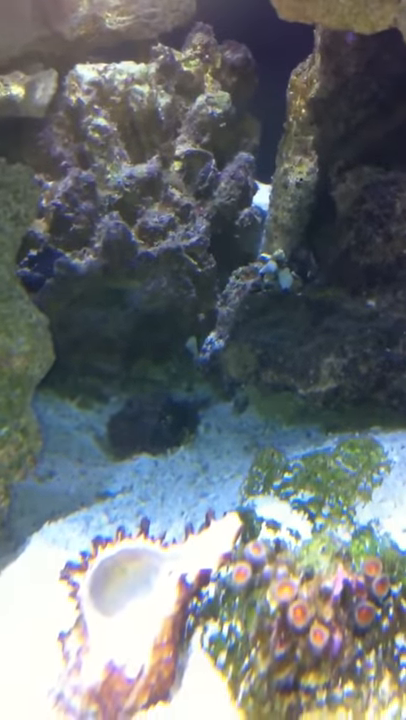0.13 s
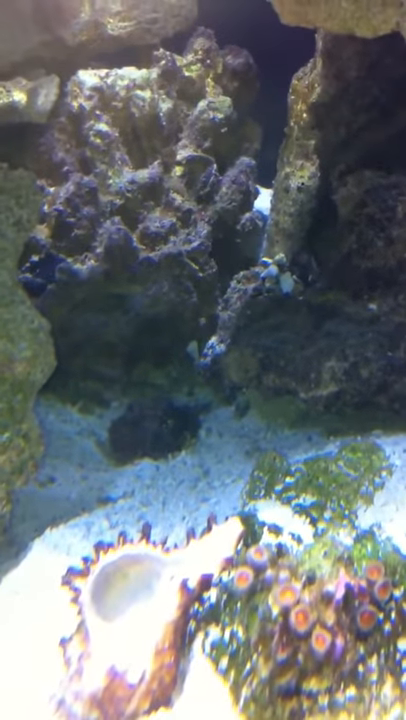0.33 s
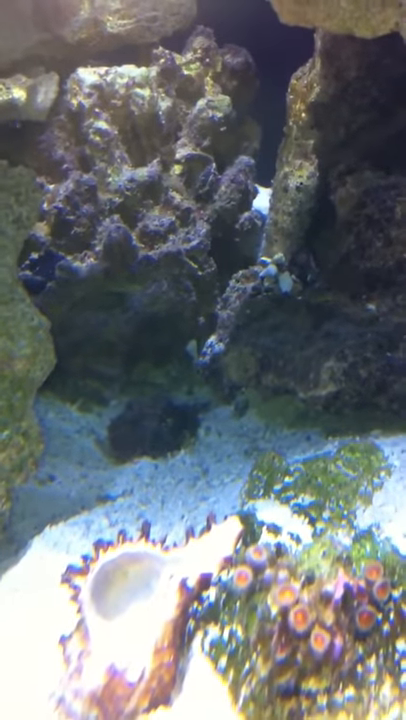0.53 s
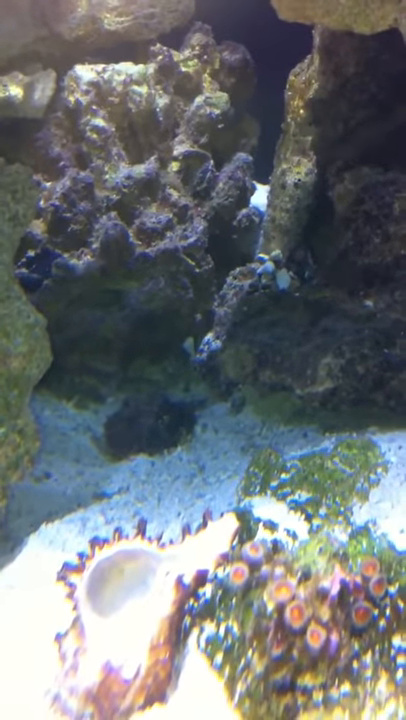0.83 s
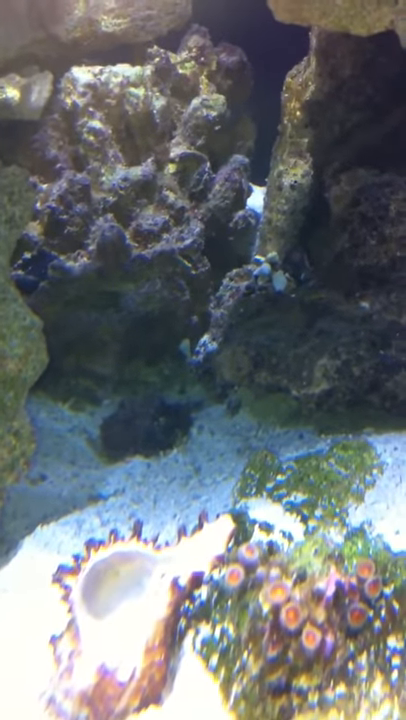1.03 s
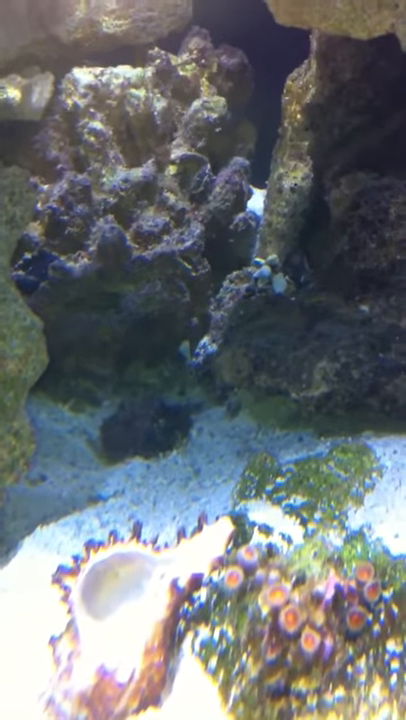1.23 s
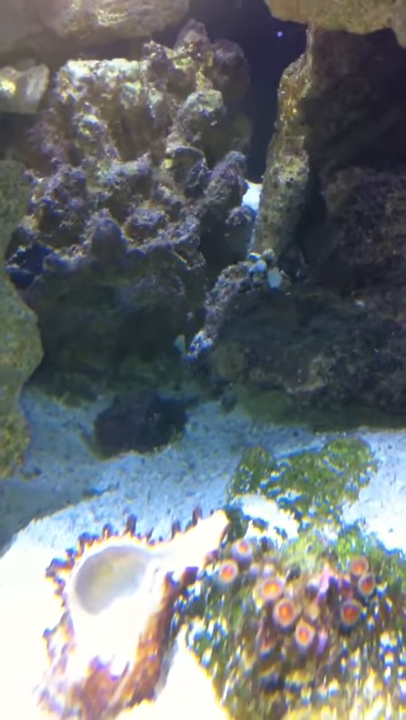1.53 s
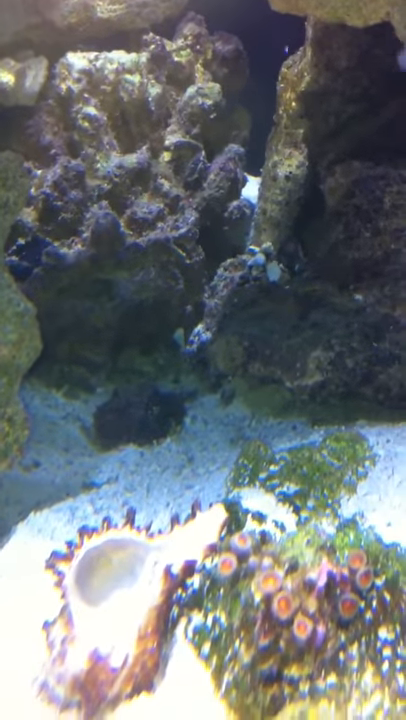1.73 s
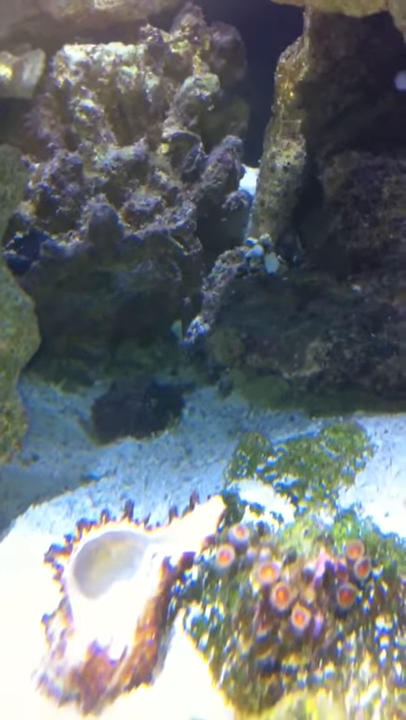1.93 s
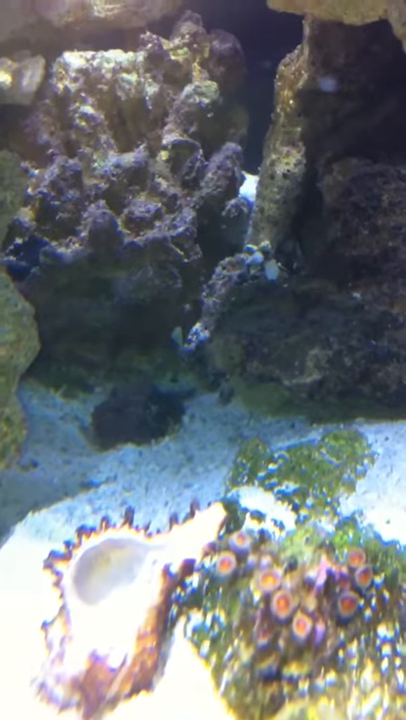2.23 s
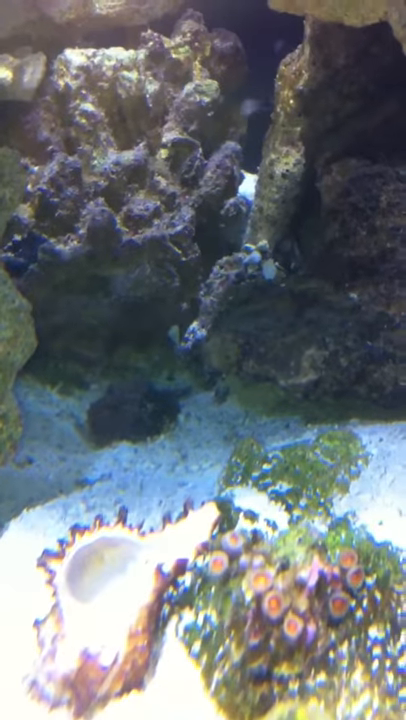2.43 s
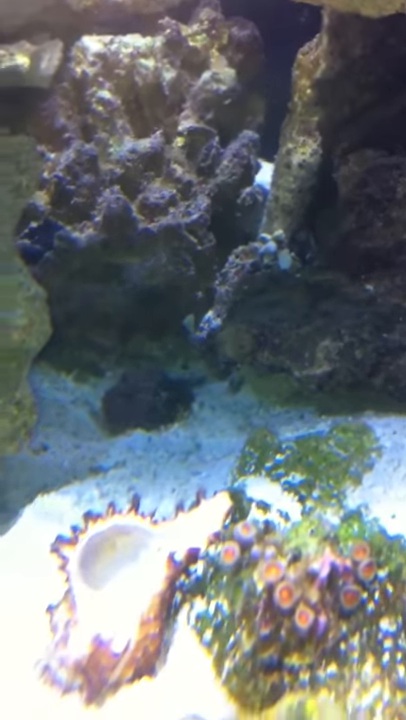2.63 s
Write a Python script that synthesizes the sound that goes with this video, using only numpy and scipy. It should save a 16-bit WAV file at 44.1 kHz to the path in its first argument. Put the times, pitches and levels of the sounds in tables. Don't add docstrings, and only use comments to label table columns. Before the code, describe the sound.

One small shell-like snap near the end, close up, above humming tank pumps and soft water hiss

```python
import sys
import numpy as np
from scipy import signal
from scipy.io import wavfile
from scipy.ndimage import uniform_filter1d

SR = 44100
rng = np.random.default_rng(int(sys.argv[2]) if len(sys.argv) > 2 else 0)


def master_out(mix):
    frames = np.transpose(np.atleast_2d(mix))
    ceiling = np.clip(frames, -1, 1)
    pcm = np.round(ceiling * 32767).astype(np.int16)
    wavfile.write(sys.argv[1], SR, pcm)


def magnitude_from_level(level_db):
    exponent = np.asarray(level_db, float) / 20
    return 10 ** exponent


N = 122598


def evened(x):
    return x / np.sqrt(np.mean(x ** 2) + 1e-20)


def curve(points):
    return np.interp(np.arange(N) / SR, *np.transpose(points))


def drift(rate_hz):
    t = np.arange(0, N + 64, 64) / SR
    slow = 0
    for f in np.geomspace(.05, 1, 16):
        slow = slow + np.sin(2 * np.pi * (f * rate_hz * t + rng.random())) / np.sqrt(f)
    return np.repeat(evened(slow), 64)[:N]


def resonate(x, peaks):
    out = 0
    for k, (hz, width, db) in enumerate(peaks):
        turn = np.exp(2j * np.pi * hz * np.arange(len(x)) / SR)
        r = np.exp(-np.pi * width / SR)
        low = signal.lfilter([(1 - r) ** 2], [1, -2 * r, r * r], x / turn)
        out = out + (-1) ** k * magnitude_from_level(db) * 2 * (turn * low).real
    return out


def tone(hz, db):
    cycles = np.cumsum(hz * np.ones(N)) / SR + rng.random()
    return np.sqrt(2) * magnitude_from_level(db) * np.sin(2 * np.pi * cycles)


def wash(points, db, patchy_db, swell_db):
    frames, hz = N // 512 + 5, np.fft.rfftfreq(2048, 1 / SR)
    a, b, patches = rng.standard_normal((frames, 1025, 3)).T
    patches = uniform_filter1d(patches, size=12, axis=0)
    patches = evened(uniform_filter1d(patches, size=6, axis=1))
    f, value = np.transpose(points)
    shape = np.interp(np.log(hz + 1), np.log(f + 1), value, -80, -80)
    z = (a + 1j * b) * magnitude_from_level(shape[:, None] + patchy_db * patches)
    noise = signal.istft(z, nperseg=2048, noverlap=1536)[1][:N]
    return magnitude_from_level(db + swell_db * drift(3)) * evened(noise)


# t/s, peak level/dB, dull share/dB
TICKS = [(.597, -59, -6), (2.2518, -61, -12), (2.2815, -51, -10), (2.3115, -53, -10), (2.3138, -51, 11),
         (2.3156, -58, 13), (2.3225, -62, 4), (2.3293, -59, 7), (2.3375, -60, 2), (2.3404, -58, 0),
         (2.3435, -61, 3), (2.3475, -57, -6), (2.3497, -58, -8), (2.3560, -41, -8), (2.3603, -46, -12),
         (2.3617, -48, -8), (2.3633, -43, -12), (2.3773, -43, -10), (2.3782, -41, -10), (2.3793, -45, -14),
         (2.3837, -43, -12), (2.3863, -42, -16), (2.3893, -43, -15), (2.3913, -41, -15), (2.3938, -41, -13),
         (2.3961, -42, -12), (2.3975, -45, -12), (2.3993, -44, -11), (2.4006, -45, -14), (2.4027, -49, -14),
         (2.4040, -47, -6), (2.4074, -42, -14), (2.4092, -49, -8), (2.4113, -47, -14), (2.4138, -50, -9),
         (2.4154, -52, -12), (2.4185, -53, -10), (2.4224, -54, -12), (2.4871, -60, -12)]
# f/Hz, width/Hz, level/dB
BRIGHT = [(9000, 1100, -13), (10500, 1400, -7), (11900, 1700, 0), (13300, 1800, -5), (14800, 1500, -6)]
# f/Hz, width/Hz, level/dB
DULL = [(3050, 2500, -5), (4240, 1430, 2), (6300, 1300, -4)]


def ticks():
    decay_s, rise_s, gain_db = .0004, .0003, 1.5
    out, t = np.zeros(N), np.arange(300) / SR
    envelope = np.exp(-t / decay_s) * np.minimum(t / rise_s, 1)
    for s, db, dull_db in TICKS:
        puff = rng.standard_normal(300) * envelope
        bright, dull = resonate(puff, BRIGHT), resonate(puff, DULL)
        mix = bright / abs(bright).max() + magnitude_from_level(dull_db) * dull / abs(dull).max()
        out[round(s * SR):][:300] += magnitude_from_level(db + gain_db) * mix
    return out


# t/s, level/dB
CRACKLE = [(2.3, -88), (2.345, -72), (2.372, -72), (2.384, -64), (2.4, -62), (2.418, -63), (2.44, -74),
           (2.5, -88)]
# f/Hz, width/Hz, level/dB
CRACKLE_BODY = [(2400, 900, 0), (3900, 900, 0), (5200, 900, -4), (6500, 800, -5)]


def crackle():
    per_s = 3000
    size = magnitude_from_level(2.0 * np.minimum(rng.exponential(1, N), 4))
    hits = size * (rng.random(N) < per_s / SR) * rng.choice([-1, 1], N)
    bright = evened(resonate(hits, BRIGHT))
    body = evened(resonate(hits, CRACKLE_BODY))
    return magnitude_from_level(curve(CRACKLE)) * (bright + magnitude_from_level(1.5) * body)


# t/s, peak level/dB, brightness/(dB per octave)
SNAPS = [
    (2.4021, -27.5, 1),
    (2.4052, -41, 3),
    (2.4344, -39, -3),
    (2.4640, -45, -3),
]
# f/Hz, level/dB, t60/s
SHELL = [(1071, -8, .07), (1513, -6, .05), (1800, -12, .015), (2067, -4, .04), (2130, -8, .04),
         (2405, -4, .05), (2750, -9, .015), (3050, -13, .015), (3380, -5, .05), (3704, -8, .04),
         (4100, -16, .015)]


def snaps():
    out, t = np.zeros(N), np.arange(4000) / SR
    for s, db, tilt_db in SNAPS:
        ring = 0
        for hz, mode_db, t60 in SHELL:
            level = mode_db + tilt_db * np.log2(hz / 2400) - 60 * t / t60
            ring = ring + magnitude_from_level(level) * np.cos(2 * np.pi * hz * (t - .0004))
        rattle = evened(resonate(rng.standard_normal(4000), [(2300, 1200, 0), (3500, 1200, -2)]))
        here = out[round(s * SR):][:4000]
        here += magnitude_from_level(db) * ring / abs(ring).max() * np.minimum(t / .0005, 1)
        here += magnitude_from_level(db - 24 - 60 * t / 0.09) * rattle
    return out + magnitude_from_level(-12) * np.roll(out, round(.006 * SR))


# t/s, peak level/dB, f/Hz, t60/s
BUBBLES = [(.192, -56, 4400, .025), (.194, -67, 9500, .02), (.262, -71, 15500, .3), (.274, -65, 15550, .06),
           (.313, -54, 3850, .02), (.325, -53, 3600, .02), (2.251, -58, 11300, .015),
           (.382, -54, 2080, .04), (.82, -56, 1500, .05), (2.188, -47, 3800, .022),
           (2.4348, -46, 2200, .018), (2.3165, -52, 3900, .018), (2.366, -45, 1090, .04),
           (2.3706, -43, 1050, .045), (2.369, -52, 2250, .025), (2.374, -55, 3950, .03),
           (2.58, -62, 4500, .05), (2.706, -60, 4300, .025), (2.737, -59, 4500, .025)]


def bubbles():
    out, t = np.zeros(N), np.arange(1600) / SR
    for s, db, hz, t60 in BUBBLES:
        sine = np.sin(2 * np.pi * hz * t * (1 + .2 * t))
        out[round(s * SR):][:1600] += magnitude_from_level(db - 60 * t / t60) * np.minimum(t / .002, 1) * sine
    return out


# multiple of the mains, level/dB
HUM = [(1, -86.5), (2, -72), (3, -61), (4, -55), (6, -62.5), (7, -68), (8, -59), (9, -66), (12, -60),
       (14, -62.5), (17, -71), (20, -72.5), (25, -78)]
TONES_HZ = [92.3, 115, 610.6, 1074, 1221.4, 1526.8, 1807.5, 2137.4, 2341, 2581, 14078.8, 15000]
TONES_DB = [-87, -75, -65, -61, -75, -75, -78, -78, -80, -76, -85, -91]
# f/Hz, width/Hz, level/dB
CABINET = [(256.2, 24, -63), (406.7, 51, -61.5)]
# t/s, level/dB
WHINE = [(0, -80), (.48, -78), (.58, -69), (.78, -65), (.9, -68), (1.45, -68), (1.7, -72), (2.1, -80),
         (2.78, -80)]


def pumps():
    mains_hz, waver_db = 60.03, .1
    hum = sum(tone(k * mains_hz, db + waver_db * drift(2.0)) for k, db in HUM)
    free = sum(tone(hz, db + waver_db * drift(1.4)) for hz, db in zip(TONES_HZ, TONES_DB))
    box = 0
    for hz, width, db in CABINET:
        box = box + magnitude_from_level(db) * evened(resonate(rng.standard_normal(N), [(hz, width, 0)]))
    whine_hz = 2078 - 14. * np.arange(N) / SR + 1.2 * drift(12)
    whine = tone(whine_hz, curve(WHINE) + .6 * drift(25))
    return hum + free + box + whine


# f/Hz, level/(dB per Hz)
PUMP = [(25, -35), (75, -36), (140, -10), (230, -1), (400, -2.5), (660, -9), (1060, -7), (1500, -26.5),
        (2500, -76)]


def pump_body():
    return wash(PUMP, -51.5, patchy_db=-0.95, swell_db=0.82)


# f/Hz, level/(dB per Hz)
HISS = [(710, -37), (1200, -3.5), (1410, -5), (1540, -3.5), (2510, -5), (6670, -21.5), (10700, -26),
        (14600, -23.5), (15600, -27)]


def water():
    return wash(HISS, -59.5, patchy_db=0.9, swell_db=0.72)


def scene():
    peel = ticks() + crackle() + snaps()
    tank = bubbles() + pumps() + pump_body() + water()
    return (peel + tank)[None]


# start t/s, end t/s, low f/Hz, high f/Hz
DROPOUTS = [(2.270, 2.279, 9500, 12500), (2.284, 2.293, 10500, 12500), (2.293, 2.311, 7500, 11500),
            (2.294, 2.303, 6000, 13000), (2.339, 2.349, 12500, 15700), (2.366, 2.375, 6800, 9500),
            (2.368, 2.373, 13000, 15700), (2.366, 2.370, 10500, 11500), (2.268, 2.276, 15000, 15700),
            (2.287, 2.305, 15000, 15700), (2.339, 2.345, 11500, 12500), (2.325, 2.345, 14300, 14800),
            (2.3215, 2.3255, 9000, 10500), (2.333, 2.337, 6300, 7500), (2.342, 2.346, 7300, 9000),
            (2.303, 2.310, 12500, 13800), (2.350, 2.384, 7700, 8500)]


def dropouts(x):
    hz, t, z = signal.stft(x, SR, nperseg=128, noverlap=96)
    lost = sum(np.outer((hz > lo) & (hz < hi), (t > a) & (t < b)) for a, b, lo, hi in DROPOUTS) > 0
    return signal.istft(z * magnitude_from_level(-22 * lost), SR, nperseg=128, noverlap=96)[1][:, :N]


def gate(x):
    from_hz, full_hz, share, spread_db = 2000, 8300, .85, 3
    open_s, shut_s = 2.22, 2.375
    n, k = np.arange(2048), np.arange(1024)
    window = np.sin(np.pi * (n[:, None] + .5) / 2048)
    basis = window * np.cos(np.pi / 1024 * np.outer(n + 512.5, k + .5)) / np.sqrt(512)
    padded = np.pad(x[0], (2048 - 200, 3072))
    starts = np.arange(0, len(padded) - 2048, 1024)
    lines = padded[starts[:, None] + n] @ basis
    t, hz = (starts - 1848) / SR, k * SR / 2048
    gated = (t < open_s) | (t > shut_s)
    reach = np.clip((hz - from_hz) / (full_hz - from_hz), 0, 1) * gated[:, None]
    strict = np.repeat(magnitude_from_level(spread_db * rng.standard_normal((len(starts), 64))), 16, axis=1)
    usual = np.sqrt(abs(uniform_filter1d(lines ** 2, size=48, axis=1)))
    frames = (lines * (abs(lines) > share * reach * strict * usual)) @ basis.T
    return (frames[1:, :1024] + frames[:-1, 1024:]).ravel()[824:][None, :N]


def roll_off(x):
    return signal.sosfilt(signal.butter(12, 15710, fs=SR, output="sos"), x)


def record(dry):
    edge = signal.firwin(1535, 15790, window=("kaiser", 9), fs=SR)
    kept = signal.oaconvolve(dropouts(dry), edge[None], "same")
    mix = gate(kept)
    return roll_off(mix)


dry = scene()
out = record(dry)
master_out(out)
```